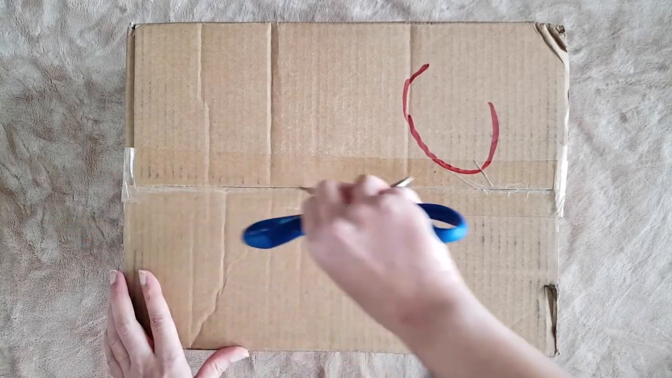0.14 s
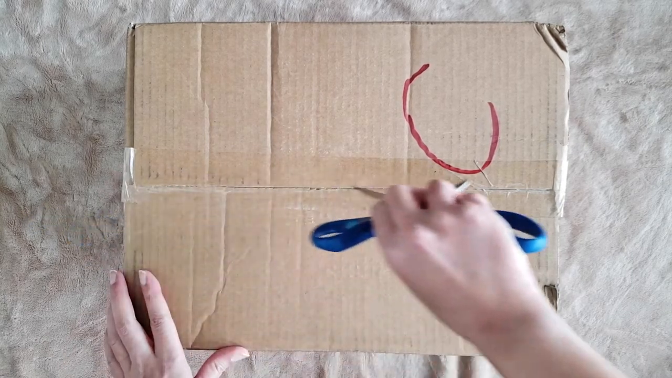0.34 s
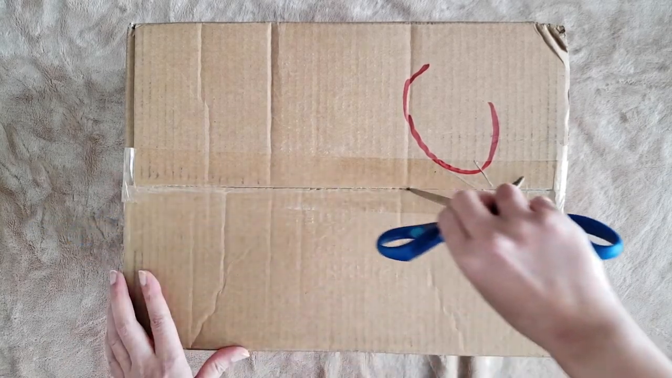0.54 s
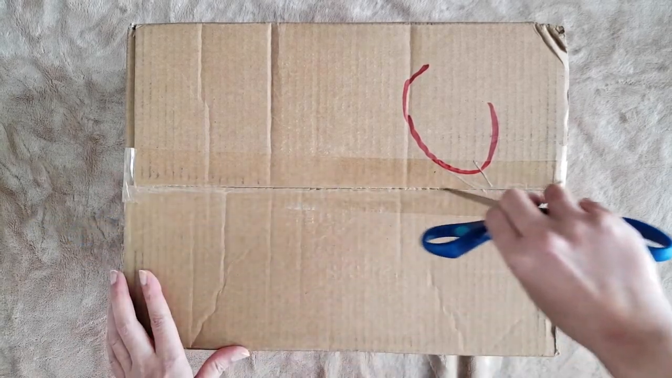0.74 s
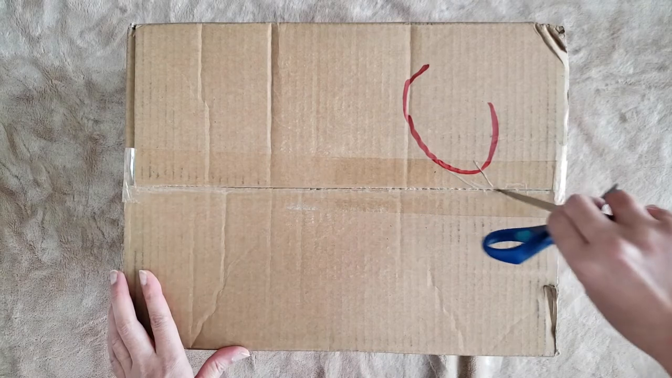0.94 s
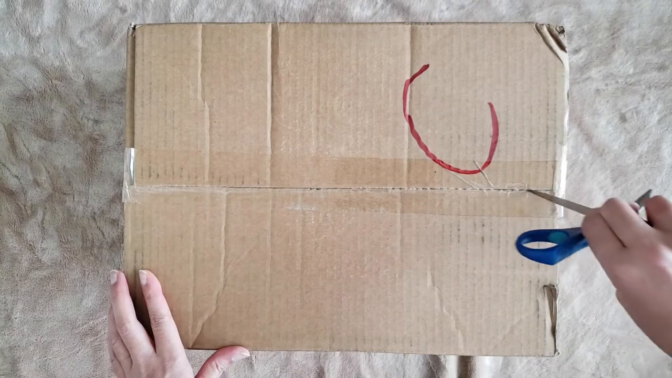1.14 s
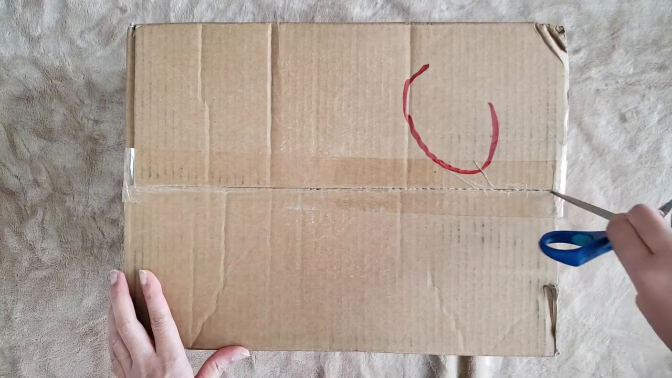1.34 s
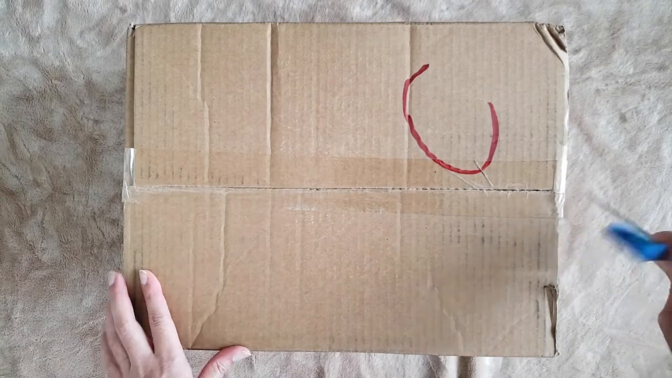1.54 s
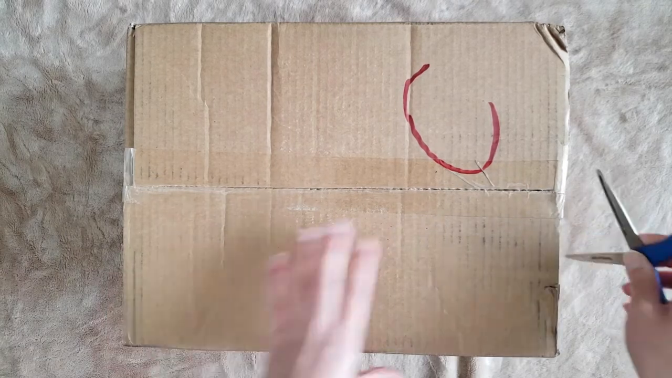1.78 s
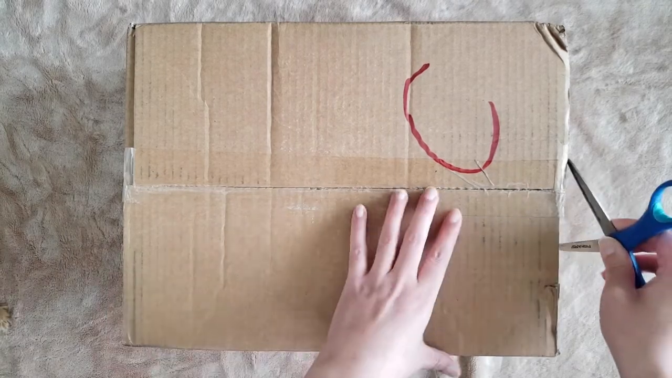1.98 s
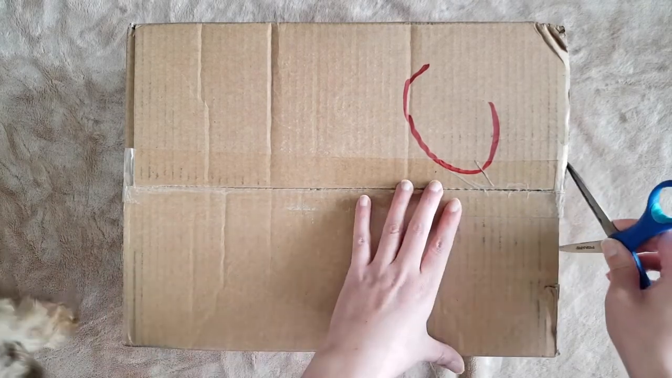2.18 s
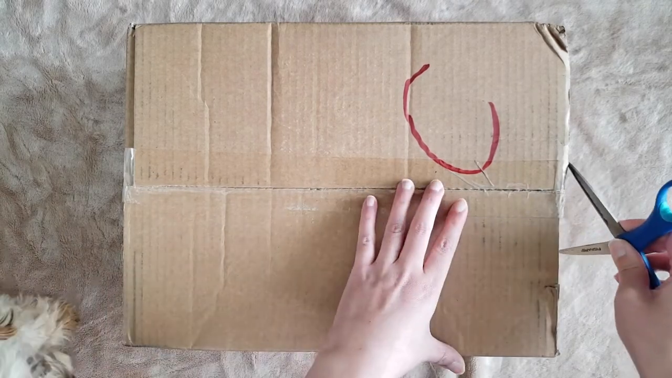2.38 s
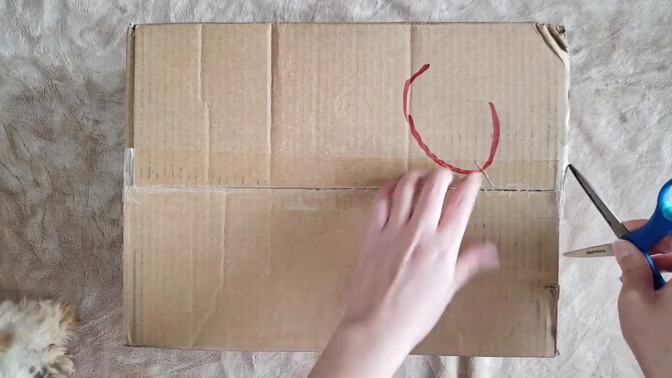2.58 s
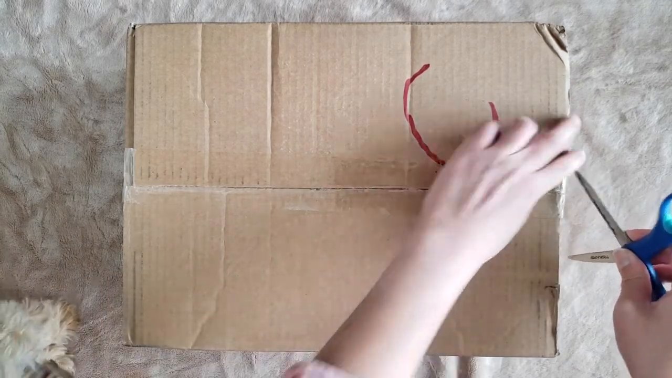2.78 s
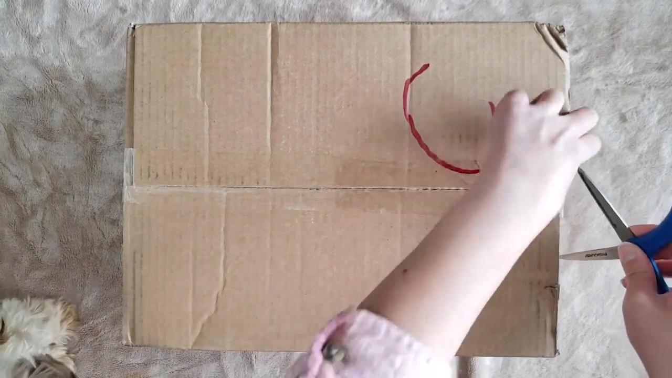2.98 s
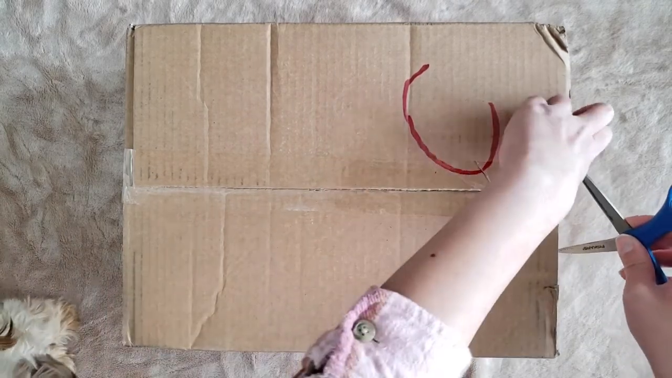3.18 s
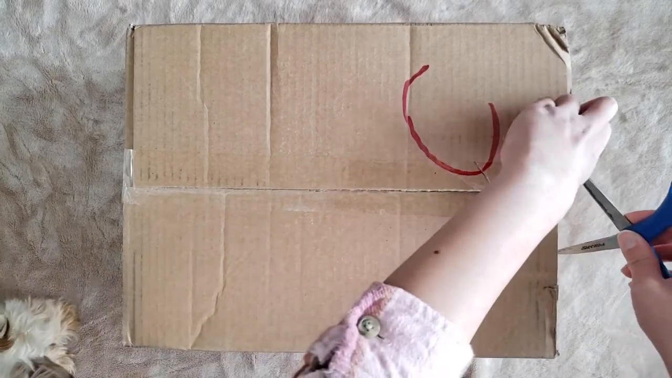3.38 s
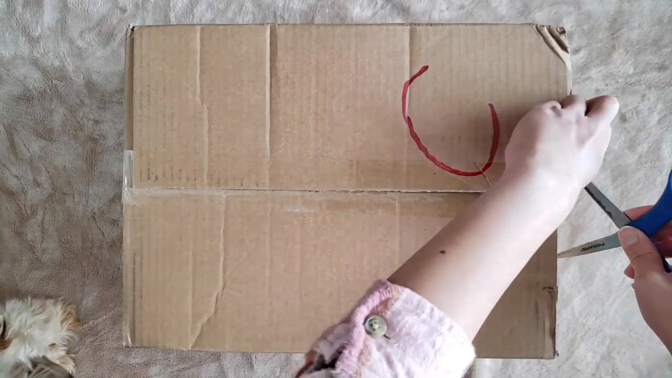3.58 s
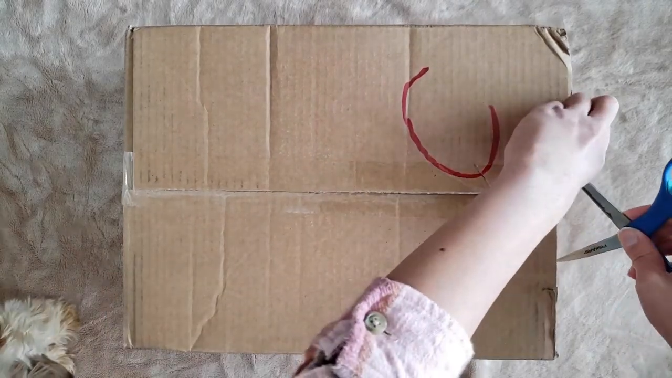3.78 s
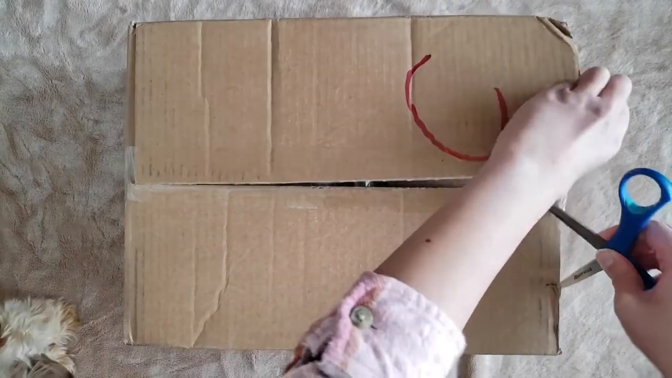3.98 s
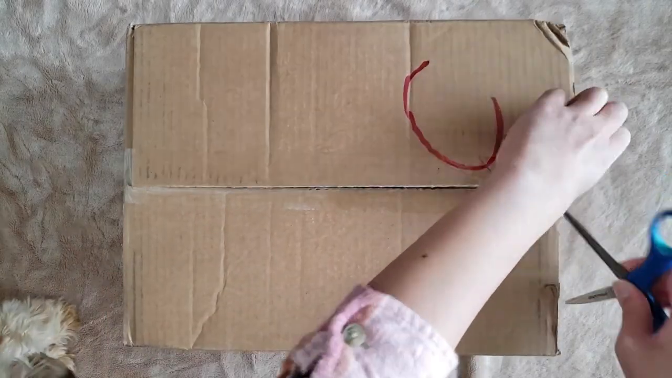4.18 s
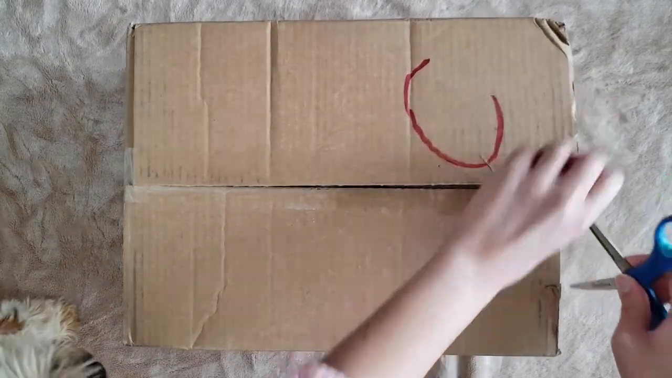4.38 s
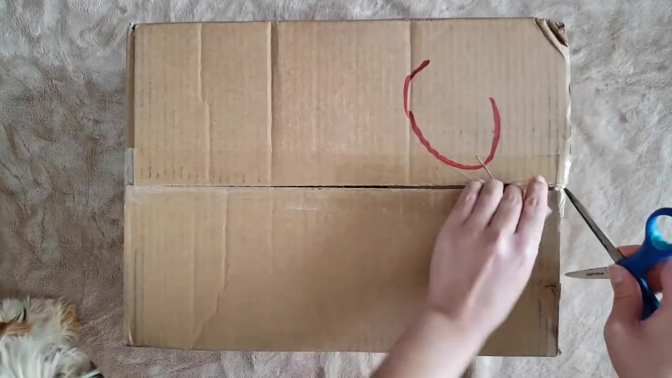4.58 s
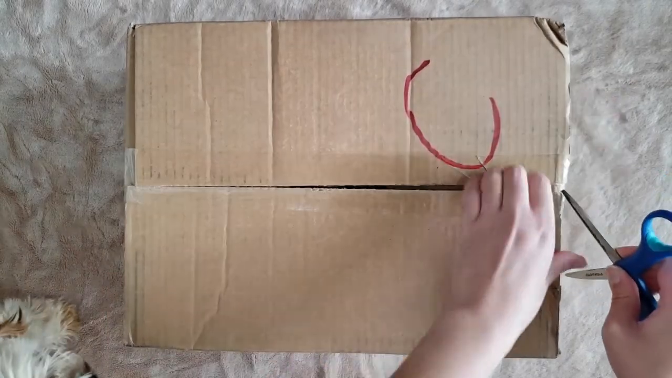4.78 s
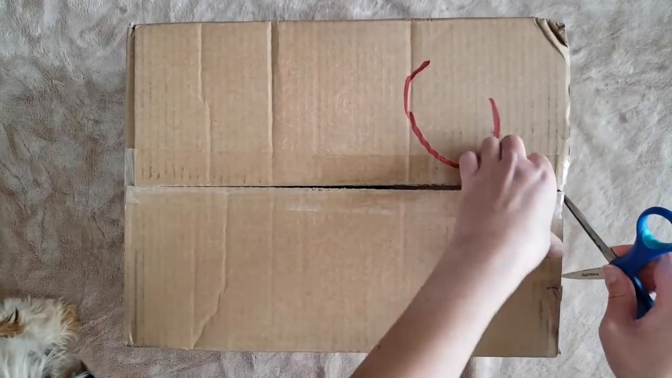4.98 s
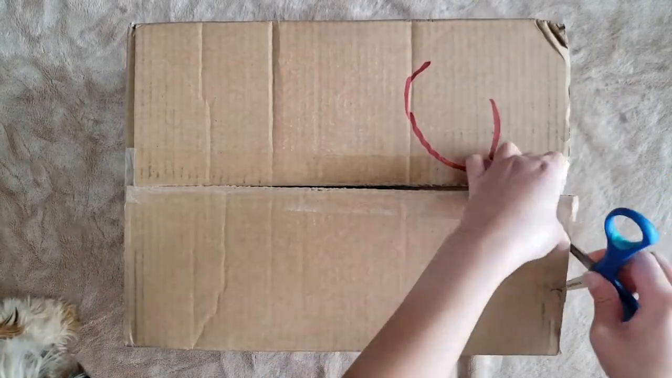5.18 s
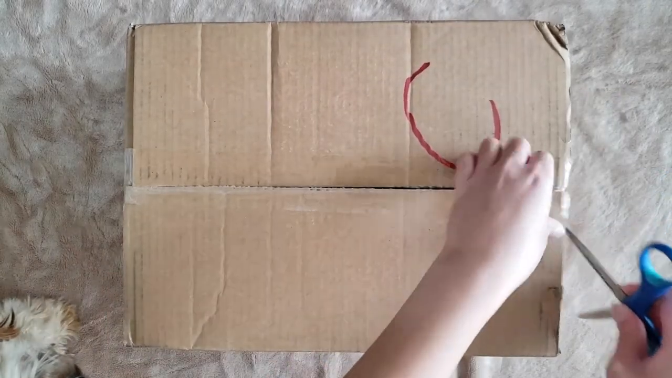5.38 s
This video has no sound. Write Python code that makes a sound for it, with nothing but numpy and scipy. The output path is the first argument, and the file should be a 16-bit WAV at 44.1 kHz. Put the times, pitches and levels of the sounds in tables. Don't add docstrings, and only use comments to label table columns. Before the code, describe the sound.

A close, dry sound of a taped cardboard box being cut open in a quiet carpeted room. From 0 to 0.7 s a scissor blade rips along the seam in a rapid zipper-like rasp, around thirty to forty ridges a second, strongest near 0.2-0.3 s, then slowing. From 0.75 to 1.43 s the pull continues in rougher, separate jerks with hollow booms, ending in a papery pop at the edge. Then it drops quiet: a bright tick at 1.63, a soft hand landing at 1.95, faint palm hiss, small clicks and creaks. Sharper tape ticks come at 3.13 and 3.52. At 3.95 a very loud crack and deep box thump release a strip, rustling briefly. Light scuffs, crackles and knocks follow around 4.3-4.9. At 5.14 a second loud snap and hollow knock, then faint rubbing until about 5.4. Low rumble and soft hiss lie beneath, with crisp phone-microphone treble.

```python
import sys
import numpy as np
from scipy import signal
from scipy.io import wavfile
from scipy.ndimage import uniform_filter1d

SR = 44100
rng = np.random.default_rng(int(sys.argv[2]) if len(sys.argv) > 2 else 0)


def pcm_store(signal):
    levels = np.round(np.clip(np.atleast_2d(signal), -1, 1) * 32767)
    wavfile.write(sys.argv[1], SR, levels.astype(np.int16).T)


def boost(x):
    u = np.asarray(x, float) / 20
    return 10 ** u


N = 239507


def evened(x):
    return x / np.sqrt(np.mean(x ** 2) + 1e-20)


def topped(x):
    return x / (abs(x).max() + 1e-12)


def read(points, hz):
    f, value = np.transpose(points)
    return np.interp(np.log(hz + 1), np.log(f + 1), value)


def add(mix, s, sound, lead_s=0.):
    at = round((s - lead_s) * SR)
    part = mix[max(at, 0):][:len(sound) + min(at, 0)]
    part += sound[max(-at, 0):][:len(part)]


def colour(x, points, tilt_db=0.):
    hz = np.fft.rfftfreq(1024, 1 / SR)
    gain_db = read(points, hz) + tilt_db * np.log2((hz + 100) / 4000)
    log_gain = np.log(boost(np.maximum(gain_db, -100)))
    circle = np.concatenate([log_gain, log_gain[-2:0:-1]])
    impulse = np.fft.ifft(np.exp(np.conj(signal.hilbert(circle)))).real
    return signal.oaconvolve(x, impulse)


def grit(size, per_s, spread_db):
    chance, sign, big = rng.random((size, 3)).T
    snaps = chance < per_s / SR
    return snaps * np.sign(sign - .5) * boost(-spread_db * np.log(big + 0.018))


def hiss(points, level_db, size, patchy_db, flicker_db):
    hop, hz = size // 4, np.fft.rfftfreq(size, 1 / SR)
    a, b, patches = rng.standard_normal((N // hop + 5, len(hz), 3)).T
    flicker = evened(uniform_filter1d(patches[0], size=4))
    patches = uniform_filter1d(patches, size=6, axis=0)
    patches = evened(uniform_filter1d(patches, size=16, axis=1))
    gain_db = read(points, hz)[:, None] + patchy_db * patches + flicker_db * flicker
    noise = signal.istft((a + 1j * b) * boost(gain_db), nperseg=size, noverlap=size - hop)[1][:N]
    return boost(level_db) * evened(noise)


def swells(rest_db, peaks_s, reach_s, peaks_db):
    fall_db, rise_share = 16.5, 0.74
    t = np.arange(0, N / SR + .01, .002)
    late = t[:, None] - peaks_s
    fall = fall_db * np.maximum(late, -late / rise_share) / reach_s
    power = boost(2 * rest_db(t)) + boost(2 * (peaks_db - fall)).sum(axis=1)
    return np.interp(np.arange(N) / SR, t, 10 * np.log10(power))


def ring(hz, t60_s, size=4000):
    t = np.arange(size) / SR
    return boost(-60 * t / t60_s) * np.sin(2 * np.pi * hz * t)


# f/Hz, level/dB, t60/s
BOX = [(125.3, -11.5, 0.14), (280, -8.5, 0.048), (424, -3.5, 0.024), (520, -13.5, 0.074),
       (776, -9.5, 0.053), (1160, -68, 0.017), (1500, -17, 0.017), (2120, -16.5, 0.017)]


def boom(push, hz, own_db=8.5, own_t60_s=0.05):
    others = sum(boost(db) * ring(f, t60_s) for f, db, t60_s in BOX)
    return topped(signal.oaconvolve(push, boost(own_db) * ring(hz, own_t60_s) + others))


# t/s, rasp peak level/dB, boom re rasp/dB, boom f/Hz
TEARS = [(0.014, -21.5, 2.5, 302), (0.039, -23, -7, 268), (0.0653, -25.5, 0, 250), (0.075, -28, 3, 261),
         (0.091, -33, -3, 280), (0.1014, -25, -2, 297), (0.1246, -26.5, -3, 288), (0.138, -29.5, 0, 270),
         (0.151, -29.5, -5, 288), (0.1655, -25, 1, 312), (0.184, -27, 3, 280), (0.1997, -19, 1, 238),
         (0.2343, -18, 1.5, 312), (0.2661, -18.5, 0.5, 257), (0.2935, -22.5, 2.5, 316),
         (0.3162, -23.5, 3.5, 256), (0.3408, -24.5, 2.5, 292), (0.3675, -24.5, 2.5, 270),
         (0.389, -21.5, 5.5, 258), (0.418, -23.5, 8.5, 312), (0.4448, -26, 3.5, 244),
         (0.4736, -24.5, 3, 296), (0.4963, -24, -2, 280), (0.5389, -27, 8.5, 307), (0.5685, -25, 4.5, 292),
         (0.602, -31, -16, 264), (0.62, -30.5, 6, 259), (0.6546, -28.5, 12, 310),
         (0.7066, -32.5, 12.5, 247)]
# t/s, rasp peak level/dB, boom re rasp/dB, boom f/Hz
EDGE_TEARS = [(0.751, -31, 1, 256), (0.7778, -32.5, 1, 280), (0.8043, -29.5, -3, 457),
              (0.837, -27, -2, 480), (0.8672, -26.5, 9.5, 283), (0.8989, -29, 13, 280),
              (0.9202, -24.5, 7, 276), (0.9495, -25, 7, 255), (0.9924, -25, 5, 257),
              (1.047, -25.5, 6.5, 452), (1.095, -22.5, 3, 440), (1.1483, -21, -1.5, 412),
              (1.1823, -32, 0, 423), (1.2052, -25.5, -2, 333), (1.2897, -27, -9, 326),
              (1.3218, -34, 5, 466), (1.3518, -38, 0, 277), (1.4062, -31.5, 4, 424),
              (1.4283, -28, 9.5, 350)]
# f/Hz, level/dB
RASP = [(350, -17), (600, 7), (660, 2), (1440, -9.5), (1610, -8.5), (2390, -10), (2780, -13.5), (4020, -14),
        (4740, -19.5), (7550, -17.5), (10100, -32.5), (12400, -33.5), (15800, -57)]
# f/Hz, level/dB, t60/s
BLADE = [(953, -8, .018), (1573, -6, 0.021), (2400, -7.5, 0.015), (3980, -9, 0.011), (7520, -10, .01)]


def tears():
    lead_s, edge_s = .015, 1.25
    ridge_colour_db, blade_spread_db = 3.5, 6
    out, t = np.zeros(N), np.arange(2400) / SR - lead_s
    for s, db, boom_db, hz in list(TEARS) + list(EDGE_TEARS):
        rip_s = (16.7 - 3.3 * s) / 1000
        tilt_db = 5.5 if s > edge_s else 2.2
        swell = (1 + ((t - .004) / (rip_s / 3)) ** 2) ** -1.6
        burst = grit(size=2400, per_s=9000, spread_db=3.5) * swell

        own_db = ridge_colour_db * rng.standard_normal(len(RASP))
        top_loss_db = 14 * max(s - .9, 0)
        rasp = [(f, d + o - top_loss_db * (f > 9500)) for (f, d), o in zip(RASP, own_db)]
        add(out, s, boost(db + 1.0) * topped(colour(burst, rasp, tilt_db)), lead_s)

        blade = np.zeros(1000)
        for f, d, t60_s in BLADE:
            mode_db = d + blade_spread_db * rng.standard_normal()
            blade += boost(mode_db) * ring(f * rng.uniform(0.918, 1.08), t60_s, size=1000)
        add(out, s, boost(db - 6.0) * topped(signal.oaconvolve(burst, blade)), lead_s)

        thud = 11.0 * np.exp(-((t - .006) / 0.00028) ** 2)
        add(out, s, boost(db + boom_db + 1.5) * boom(burst * swell + thud, hz, own_db=9.5), 0.01405)
    return out


# f/Hz, level/dB
CRACK = [(410, -27), (700, -3.5), (1120, -10), (1550, -10), (2610, -13.5), (3140, -15.5), (6680, -7.5),
         (9880, -24), (11600, -31.5), (15800, -56)]


def dulled(db):
    return [(f, d - 0.1 * min(db, 0) * (f > 9500) * -1) for f, d in CRACK]


def flick(hz):
    t = np.arange(300) / SR
    span = t / (0.00025 + 1.4 / hz)
    return topped(span ** 3 * np.exp(-3 * span) * np.sin(2 * np.pi * hz * t))


# t/s, peak level/dB, f/Hz, knock re tick/dB
TICKS = [(1.6308, -20.5, 7440, -16), (1.9666, -32, 7900, 4), (2.242, -26, 7540, -32),
         (2.31, -36.5, 6130, -20), (2.4017, -36.5, 6540, -18), (2.5318, -32.5, 7800, -26),
         (2.625, -30, 7340, 6), (2.705, -31, 7000, -15), (2.828, -28, 7100, 10), (2.9197, -39, 6440, -8),
         (2.934, -32, 6860, 7), (3.1338, -16, 6570, -8.5), (3.3045, -35, 6740, -2),
         (3.4978, -29.5, 6260, -12), (3.5248, -14.5, 5840, -6), (3.637, -40, 8900, -15),
         (3.6702, -25, 5300, -3), (3.757, -31.5, 6470, -19), (3.81, -29, 6060, -20),
         (3.8424, -30, 7000, -19), (3.915, -25, 6440, -18)]
# t/s, peak level/dB, f/Hz, knock re tick/dB
CUT_TICKS = [(3.9518, -2, 7580, -21), (3.9965, -18, 6500, 10), (4.068, -28, 5640, -14),
             (4.187, -37.5, 6500, -21), (4.214, -41, 6800, -17.5), (4.2801, -32.5, 6740, 4),
             (4.598, -38, 7140, -12), (4.811, -30, 5100, -15), (4.312, -27, 6750, 3),
             (4.3728, -21, 6650, -9), (4.5073, -22.5, 7000, 5.5), (4.694, -32.5, 7840, -20),
             (4.7214, -31.5, 7250, -16), (4.7985, -32, 7150, -8), (4.8521, -28, 6440, 8.5),
             (4.8706, -20.5, 7050, -17), (4.888, -26, 6300, -5), (4.954, -34, 7450, -13),
             (5.1443, -4.5, 7900, -25), (5.2468, -24, 7050, 0), (5.4, -42, 5700, -15),
             (5.4147, -24, 7560, -0.5)]
# t/s, peak level/dB, f/Hz, knock re tick/dB
TAPS = [(3.4097, -37.5, 2150, -12), (3.6207, -34, 2200, 5), (3.7541, -38.5, 1860, -7),
        (3.795, -35.5, 2300, -15), (3.8902, -32.5, 2240, -13), (4.1188, -29.5, 2800, 5),
        (4.1459, -37, 2340, -11), (4.502, -37, 1470, 5), (4.6536, -31.5, 1550, 8.5), (5.0, -49, 3500, -8),
        (5.04, -29, 2400, -5), (5.1439, -4.5, 1390, -20), (5.1443, -5, 2340, -16)]
# t/s, peak level/dB, f/Hz
CREASES = [(2.2238, -44, 6980), (2.2514, -35, 7000), (2.3346, -42, 4820), (2.478, -38, 6640),
           (2.6544, -46, 7110), (2.7666, -41, 7060), (2.8794, -38, 7010), (2.975, -35, 6960),
           (3.1994, -38, 6400), (3.249, -46, 6650), (3.2715, -40, 5610), (3.3398, -44, 6430),
           (3.3526, -41, 7350), (3.3732, -38, 7160), (3.3917, -39.5, 5700), (3.418, -35, 6650),
           (3.4496, -46, 5350), (3.468, -42, 6370), (3.6195, -35, 5630), (3.7414, -39, 6190),
           (3.7606, -34, 7540), (3.7955, -32, 6200), (3.8626, -36, 6130), (3.8896, -36, 5900),
           (3.9347, -33, 7170), (3.9634, -7, 6660), (4.146, -31, 6420), (4.245, -39, 7310),
           (4.3054, -33.5, 7040), (4.3532, -48, 6860), (4.4129, -40, 6950), (4.4333, -42, 7330),
           (4.4934, -39, 7080), (4.5004, -29, 7360), (4.6528, -39, 7490), (4.8838, -20.5, 6550)]


def ticks():
    crease_knock_db = -12
    creases = [(*row, crease_knock_db) for row in CREASES]
    kinds = [(TICKS, 35), (CUT_TICKS, 23), (TAPS, 28), (creases, 16)]
    out, t = np.zeros(N), np.arange(3000) / SR
    for rows, t60_ms in kinds:
        for s, db, hz, knock_db in rows:
            fade = boost(-60 * t / (t60_ms / 1000))
            crackle = grit(size=3000, per_s=12000, spread_db=2.0) * fade
            add(out, s, boost(db - 2.5) * (flick(hz) + boost(-11.0) * flick(.56 * hz)))
            add(out, s, boost(db - 7.0) * topped(colour(crackle, dulled(db - 1.5))))
            knock = boom(crackle, rng.uniform(220, 616), own_db=-4.0)
            add(out, s, boost(db + knock_db - 5.0) * knock)
    return out


# t/s, rustle peak level/dB, boom level/dB, boom f/Hz, shudder t60/ms
POPS = [(1.4235, -24, -20, 345, 60), (1.4348, -12, -55, 365, 120), (2.0604, -44, -47, 534, 97),
        (2.826, -33, -24.5, 300, 64), (2.9333, -24.5, -27, 313, 63), (3.5249, -15, -34, 524, 100),
        (3.9516, -1.5, -17, 221, 74), (3.9964, -12.5, -21.5, 267, 214), (4.0895, -23, -28, 283, 100),
        (4.527, -25.5, -25, 253, 120), (5.1438, -18, -16.5, 335, 120)]
# t/s, rustle peak level/dB, boom level/dB, boom f/Hz, shudder t60/ms
THUMPS = [(1.939, -31, -32, 420, 48), (2.6282, -25.5, -34, 342, 86), (3.1338, -13.5, -25.5, 452, 146),
          (3.9633, -4, -13, 350, 132), (4.306, -27, -40, 310, 35), (4.6533, -28.5, -45, 278, 96),
          (4.793, -21, -35, 390, 75), (4.8527, -21, -35, 316, 79), (5.155, -4, -20.5, 303, 83),
          (5.1867, -32, -20, 450, 83)]
# t/s, rustle peak level/dB, boom level/dB, boom f/Hz, shudder t60/ms
SCUFFS = [
    (4.5015, -22, -29.5, 210, 53),
    (4.3, -18.5, -29.5, 340, 210),
    (4.625, -32, -37, 360, 34),
]


def pops():
    kinds = [(POPS, -0.5), (THUMPS, -5.5), (SCUFFS, -10)]
    out, t = np.zeros(N), np.arange(9000) / SR
    for rows, tilt_db in kinds:
        for s, db, boom_db, hz, t60_ms in rows:
            clumps = boost(4.2 * evened(uniform_filter1d(rng.standard_normal(len(t)), size=250)))
            fade = boost(-60 * t / (t60_ms / 1000))
            rustle = grit(size=9000, per_s=16000, spread_db=3.5) * clumps * fade
            add(out, s, boost(db - 8.5) * topped(colour(rustle, dulled(db + 3), tilt_db)))
            add(out, s, boost(boom_db + 3.0) * boom(rustle * fade ** 0.8, hz, own_db=0.0))
    return out


# t/s, peak level/dB, f/Hz, t60/ms
KNOCKS = [(1.42, -15, 370, 57), (1.428, -19, 590, 33), (1.44, -16.5, 388, 40), (1.94, -23.5, 604, 26),
          (2.057, -39, 910, 45), (2.63, -30.5, 413, 50), (2.827, -32, 400, 48), (2.828, -35, 1360, 35),
          (2.934, -37, 308, 63), (2.936, -39, 900, 35), (2.985, -30, 356, 56), (3.134, -23, 770, 50),
          (3.14, -20, 233, 70), (3.526, -28, 494, 55), (3.966, -4, 305, 42), (3.969, -12.5, 107, 130),
          (3.977, -11.5, 380, 49), (3.978, -15, 540, 45), (4.003, -17, 332, 60), (4.308, -30, 315, 50),
          (4.503, -35, 1240, 30), (4.505, -28, 497, 40), (4.527, -25, 418, 40), (4.545, -24, 332, 61),
          (4.652, -34, 496, 37), (4.757, -28.5, 382, 60), (4.758, -32, 850, 50), (4.768, -28, 520, 37),
          (4.783, -35, 1300, 35), (4.777, -27, 454, 50), (4.791, -27, 700, 32), (4.855, -32, 312, 54),
          (5.1459, -5.5, 320.6, 85), (5.1465, -14, 610, 54), (5.154, -11, 299, 71), (5.187, -19.5, 452, 60)]


def knocks():
    out, push = np.zeros(N), np.hanning(24)
    for s, db, hz, t60_ms in KNOCKS:
        add(out, s, boost(db) * boom(push, hz, own_db=10.5, own_t60_s=t60_ms / 1000))
    return out


# start t/s, length/s, level/dB
PEELS = [(1.57, 0.014, -52.5), (1.933, 0.037, -56), (3.1276, 0.0085, -38), (3.801, 0.011, -46.5),
         (4.526, .02, -47), (4.795, 0.0068, -41.5), (3.954, 0.01, -23), (2.243, 0.027, -55.5),
         (4.842, .01, -48), (5.03, 0.01, -42.5), (5.1172, 0.018, -42), (5.146, 0.012, -30.5),
         (5.392, 0.022, -49.5)]
# f/Hz, level/dB
PEEL = [(1500, -17.5), (2500, 1), (3300, -18), (4200, -16), (4900, -3.5), (7200, 5), (9000, -12),
        (15800, -42)]


def peels():
    out, t = np.zeros(N), np.arange(4000) / SR
    for s, length_s, db in PEELS:
        shape = np.minimum(t / 0.0019, 1) * boost(-1500 * np.maximum(t - length_s, 0))
        snaps = colour(grit(size=4000, per_s=15000, spread_db=4.5), PEEL)
        add(out, s, boost(db) * evened(snaps)[:4000] * shape)
    return out


def specks(level_db):
    out = np.zeros(N)
    for hz in (2400, 5000, 6200, 7600):
        out += signal.oaconvolve(grit(size=N, per_s=22, spread_db=4.0), flick(hz))[:N]
    return boost(level_db) * evened(out)


# t/s, scrape level/dB
DRAG = [(0, -44.5), (0.1, -48), (0.3, -47), (0.6, -48.5), (0.72, -51), (0.85, -49), (1.0, -45),
        (1.12, -53.5), (1.32, -51), (1.5, -59)]
# peak t/s, reach/s, sliding level/dB, pressing level/dB
MOVES = [(0.19, 0.031, -43, -38), (1.358, 0.031, -36.5, -32.5), (1.428, 0.038, -32.5, -21.5),
         (1.63, 0.13, -55.5, -60), (1.952, 0.026, -51, -46), (1.99, 0.092, -50, -52),
         (2.07, 0.048, -56, -53), (2.25, 0.059, -57, -54), (2.5, 0.21, -57.5, -67),
         (2.66, 0.23, -61, -44.5), (2.845, 0.054, -50, -44), (2.961, 0.14, -49, -42), (3.25, 0.3, -59, -53),
         (3.4, 0.087, -58.5, -62), (3.6, 0.19, -55.5, -49), (3.76, 0.35, -55, -46),
         (3.92, 0.2, -48.5, -45.5), (4.1, 0.048, -52, -37.5), (4.29, 0.074, -52, -47),
         (4.54, 0.03, -59, -27), (4.46, 0.12, -56, -58), (4.69, 0.33, -56, -51), (4.779, 0.06, -55, -29.5),
         (4.98, 0.4, -51.5, -58), (5.14, 0.045, -49, -46), (5.28, 0.086, -53, -42),
         (5.4, 0.31, -53.5, -59.5)]
# f/Hz, level/dB
RUB = [(2500, -38), (3300, -10), (4600, -5), (5800, -2.5), (7200, 3), (8400, -4), (9500, -14), (12500, -27),
       (15800, -65)]
# f/Hz, level/dB
SCRAPE = [(600, -39), (1000, 5), (1600, 2.5), (2400, -2), (2900, -6), (3900, -6.5), (5000, -31)]
# f/Hz, level/dB
GROAN = [(88, -28), (150, -9), (300, 1), (398, -2.5), (581, -8.5), (897, -11.5), (1090, -17.5), (1440, -21),
         (2000, -25), (2600, -33), (4400, -120)]


def handling():
    s, reach_s, slide_db, press_db = np.transpose(MOVES)
    slide_share = 0.69
    move_scrape_db = slide_share * slide_db + (1 - slide_share) * press_db - 5

    def drag_db(t):
        return np.interp(t, *np.transpose(DRAG))

    rub_db = swells(lambda t: np.maximum(drag_db(t) - 10, -66.5), s, reach_s, slide_db)
    scrape_db = swells(lambda t: np.maximum(drag_db(t), -61.5), s, reach_s, move_scrape_db)
    groan_db = swells(lambda t: np.maximum(-38.5 + 0.71 * (drag_db(t) + 46.5), -55),
                      s, reach_s, press_db)
    rub = hiss(RUB, rub_db - .6, size=256, patchy_db=.7, flicker_db=1.2)
    scrape = hiss(SCRAPE, scrape_db - 1.5, size=256, patchy_db=1.1, flicker_db=1.5)
    groan = hiss(GROAN, groan_db, size=512, patchy_db=3.0, flicker_db=2.5)
    return rub + specks(rub_db - 16.5) + scrape + groan


# peak t/s, reach/s, level/dB
SWEEPS = [(1.98, 0.11, -55), (2.34, 0.087, -62), (2.48, .12, -58), (2.6, 0.29, -56), (2.74, .12, -64),
          (4.97, .2, -59), (5.38, 0.13, -63.5)]
# f/Hz, level/dB
SWEEP = [(1500, -6), (2050, -21), (2420, 1.5), (2900, -8), (4400, -5), (5300, -5), (9900, -12),
         (12500, -21), (15500, -48)]


def sweeps():
    level_db = swells(lambda t: np.full(len(t), -90.), *np.transpose(SWEEPS))
    return hiss(SWEEP, level_db, size=256, patchy_db=2.0, flicker_db=2.2)


# t/s, level/dB
RUMBLE_DB = [(0, -36.5), (1.15, -34.5), (1.5, -39.5), (3.4, -38), (3.8, -42.5), (5.43, -41)]
# t/s, level/dB
JOLTS = [(0.24, -24.5), (1.44, -40), (1.97, -31), (3.15, -30), (3.33, -32.5), (3.98, -20.5), (4.52, -34),
         (5.15, -35), (5.43, -32)]
# f/Hz, level/dB
RUMBLE = [(12, -71), (20, -44), (32, -40), (42, -38), (59, 10), (78, -3.5), (98, -10), (135, -4.5),
          (153, -8.5), (168, -48), (220, -15), (290, -47), (480, -120)]
# f/Hz, level/dB
FLOOR = [(110, -6), (180, 8), (293, 6), (495, -29), (790, -10), (989, -43), (1110, -0.5), (1260, -35),
         (3040, -37), (5750, -29), (7200, -43), (11300, -42), (15800, -85)]


def background():
    s, db = np.transpose(JOLTS)
    jolt_reach_s, floor_db = 0.064, -52
    lumps_db = swells(lambda t: np.interp(t, *np.transpose(RUMBLE_DB)), s, jolt_reach_s, db)
    rumble = hiss(RUMBLE, lumps_db - .6, size=4096, patchy_db=0.76, flicker_db=0.4)
    return rumble + hiss(FLOOR, floor_db, size=512, patchy_db=1.8, flicker_db=3.0)


# f/Hz, t60/s
ROOM = [(200, 0.32), (4000, 0.41), (10000, 0.19)]


def room(x):
    taps = np.zeros(SR // 2)
    at = np.arange(160, len(taps) - 20, 20)
    taps[at + rng.integers(0, 20, len(at))] = rng.choice([-1., 1.], len(at))
    hz, t, z = signal.stft(taps, SR, nperseg=256)
    tail = signal.istft(z * boost(-60 * t / read(ROOM, hz)[:, None]), SR, nperseg=256)[1]
    return signal.fftconvolve(x, tail / np.linalg.norm(tail))[:N]


def scene():
    box = tears() + ticks() + pops() + knocks() + peels()
    return (box + boost(-12.5) * room(box) + handling() + sweeps() + background())[None]


def low_pass(x):
    return signal.sosfilt(signal.butter(12, 16000, fs=SR, output="sos"), x)


def record(dry):
    low_cut_hz, top_hz, limit = 50, 16020, .77
    x = signal.sosfilt(signal.butter(2, low_cut_hz, "high", fs=SR, output="sos"), dry)
    x = np.clip(x, -limit, limit)
    x = signal.sosfilt(signal.cheby2(20, 60, top_hz, fs=SR, output="sos"), x)
    return low_pass(x)


dry = scene()
out = record(dry)
pcm_store(out)
```